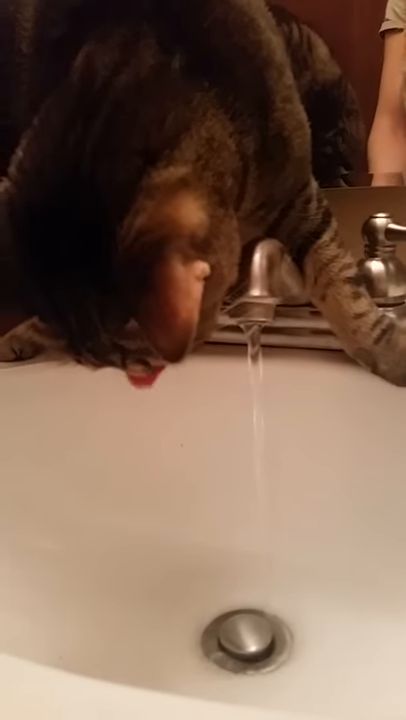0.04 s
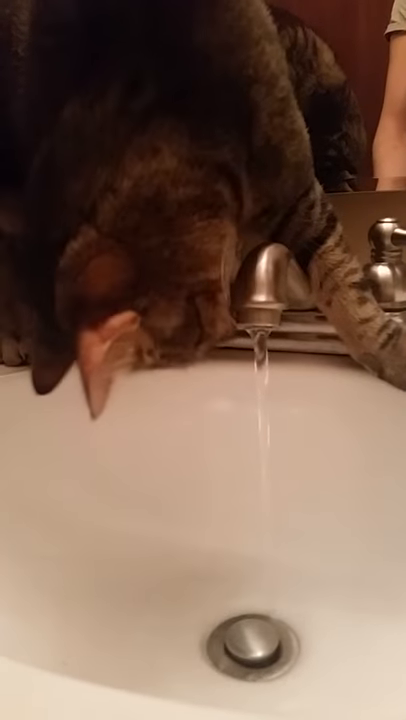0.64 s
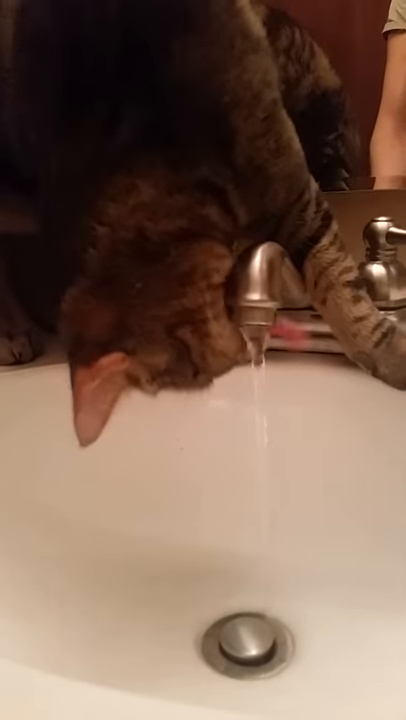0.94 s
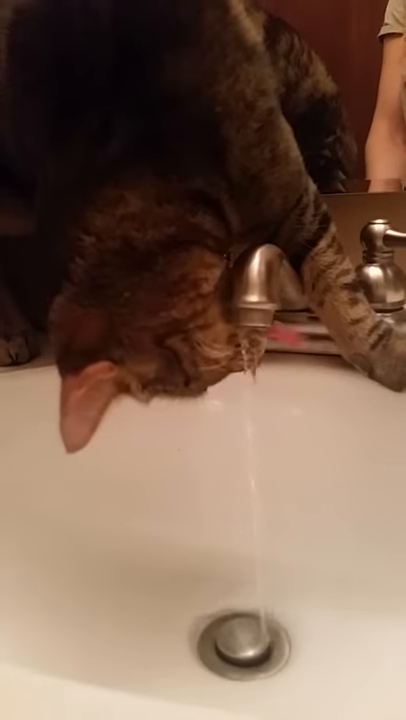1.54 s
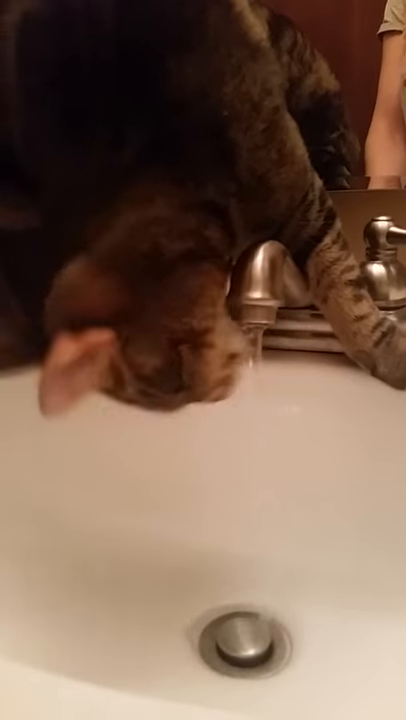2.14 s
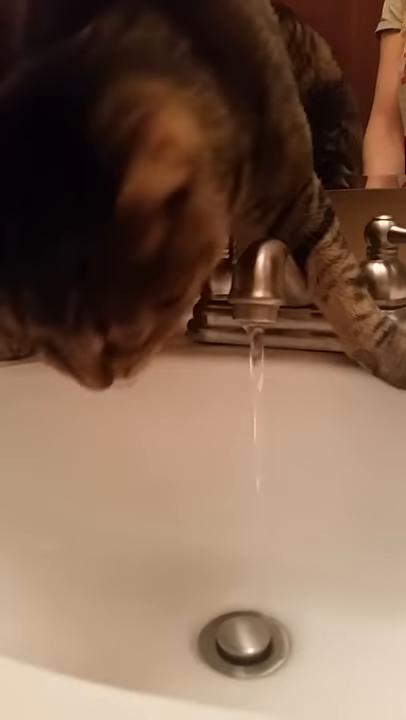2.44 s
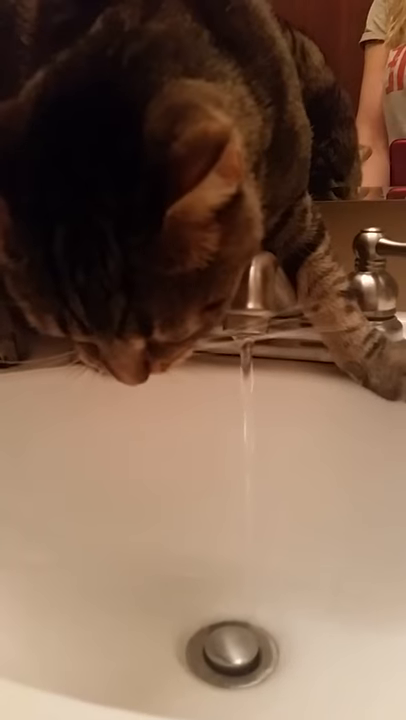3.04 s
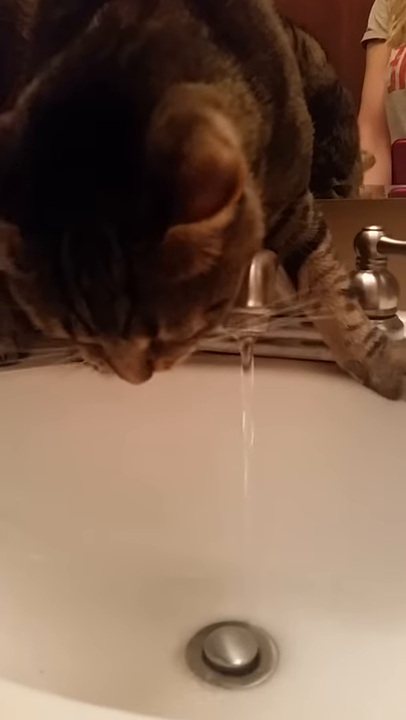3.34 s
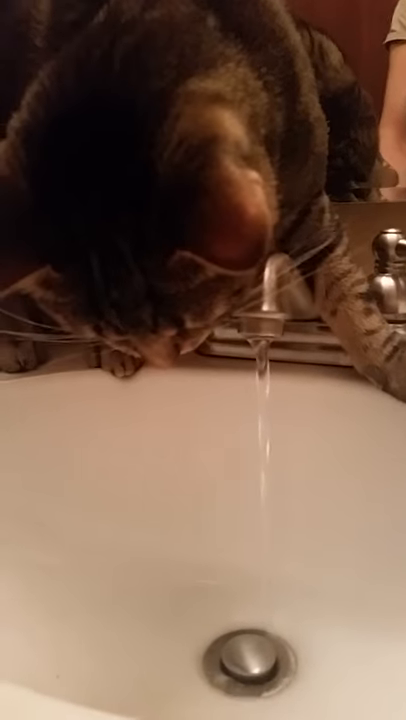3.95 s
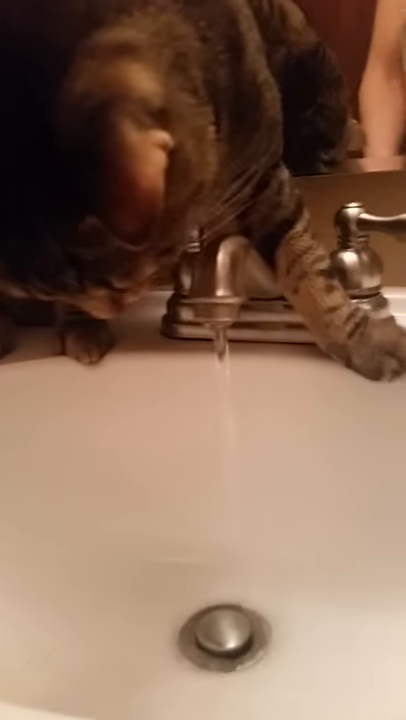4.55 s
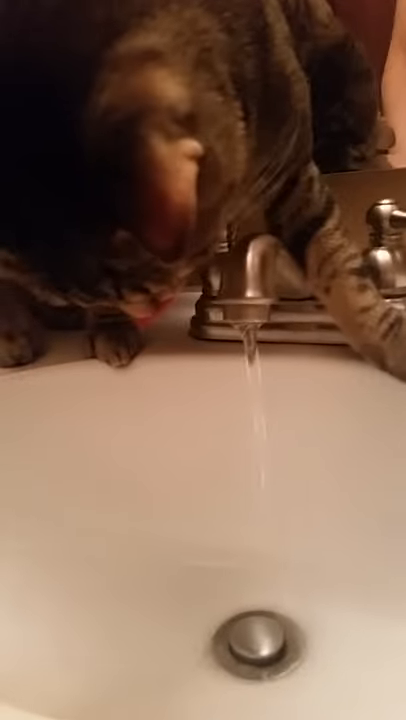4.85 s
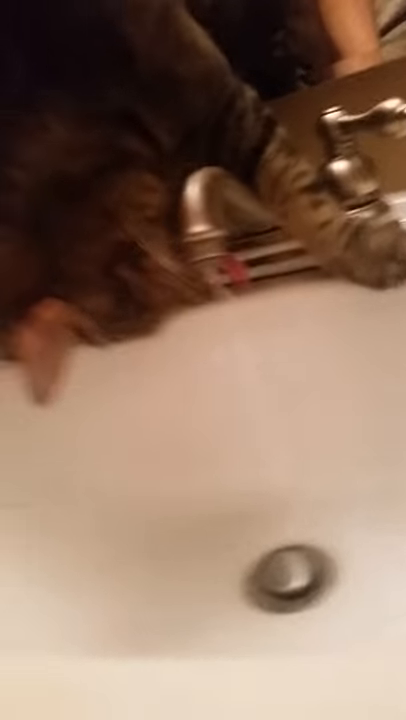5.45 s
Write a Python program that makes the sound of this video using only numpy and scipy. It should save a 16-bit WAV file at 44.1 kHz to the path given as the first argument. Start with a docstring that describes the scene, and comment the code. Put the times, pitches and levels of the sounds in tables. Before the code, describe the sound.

A thin tap stream hisses and whistles into a sink while a cat laps faintly, over a humming bathroom fan.

```python
"""Cat drinking at a bathroom tap

A handheld stereo phone, close to a china basin in a small bathroom. The barely open valve hisses and
whistles very high, its thin stream patters in the bowl, and a cat's tongue slaps it and flicks off drops.
Behind them an extractor fan hums and rumbles. Near the end the phone shifts and is softly bumped."""
import sys
import numpy as np
from scipy import signal
from scipy.fft import rfft, irfft
from scipy.io import wavfile

SR = 44100
rng = np.random.default_rng(int(sys.argv[2]) if len(sys.argv) > 2 else 0)


def wav_out(sig):
    """Save sig, one row per channel (or a flat mono array), as 16-bit PCM at SR to the path in sys.argv[1]."""
    wavfile.write(sys.argv[1], SR, np.round(np.clip(np.atleast_2d(sig).T, -1, 1) * 32767).astype(np.int16))


N = 251370
TIME = np.arange(N) / SR
FREQ = np.maximum(np.arange(N // 2 + 1) * SR / N, 1)

# laps of the tongue: start_s, slap_relative_db, centre_hz, width_octaves, t60_s, pocket_relative_db
LAPS = [(1.229, -35, 9500, 0.5, .007, -65), (1.3875, -24.5, 11800, 0.18, 0.007, -63),
        (1.650, -44, 3750, 0.12, 0.008, -51), (1.866, -35, 5600, 0.4, 0.007, -46),
        (1.953, -47, 2730, 0.25, 0.025, -57)]


def valve_hiss():
    """Water squeezes through the narrow seat and hisses, spluttering when the tongue narrows the spout."""
    # spectrum of the hiss: frequency_hz, relative_db
    spectrum = [(2900, -73), (4200, -59), (5900, -47), (6950, -1), (7900, -12), (8700, 0.5), (9400, -5.5),
                (10800, 5), (11250, 2), (12300, 13), (13200, 1), (14400, -3)]
    # how its colour differs between the microphones: frequency_hz, left_minus_right_db
    shade = [(4000, -17), (6200, -29), (7000, -1), (7700, 15.5), (9000, -2.5), (10700, -5), (11300, -10),
             (11700, -9), (12100, -4.5), (12500, -14.5), (13000, -3), (14000, -10)]
    # the tap from the phone's position: time_s, level_db, balance_db (only its swing about the mean counts)
    tap = [(0.15, -44, -5.5), (1.96, -42.5, -3.5), (3.4, -43, -4.5), (4.5, -43, -4.5), (5.0, -42, -5),
           (5.35, -43.5, -2.5), (5.65, -43.5, -1)]
    # splutters at the spout: peak_s, db_against_steady_hiss, length_s
    splutters = [(1.402, -2, 0.036), (1.745, 2.5, 0.04), (1.845, 0, 0.07), (2.9, -7, .06),
                 (3.41, -7, 0.035), (3.92, -1, 0.058)]
    hiss = colour(stereo_noise(unshared=.98), spectrum)
    hiss = np.array([colour(mic, [(hz, sign * db / 2) for hz, db in shade])
                     for mic, sign in zip(hiss, (1, -1))])
    hiss = level(flutter(hiss, rate_hz=23), 0) * undb(curve(tap))
    balance_db = curve(tap, column=2)
    return hiss * pan(balance_db - np.mean(balance_db)) * surges(splutters, 0)


def valve():
    """Eddies ring the valve's high whistles, which flicker together with its hiss."""
    # main whistle: pitch_hz, width_hz, relative_db
    high_modes = [(12190, 30, -11), (12268, 35, -7), (12385, 45, -2), (12470, 40, -7), (12531, 36, 0),
                  (12620, 40, -12)]
    # fainter, lower whistle that comes out as the phone shifts: pitch_hz, width_hz, relative_db
    low_modes = [(11476, 45, -6), (11716, 50, 0)]
    # the whistle beams narrowly, so it swells and fades at the phone: time_s, level_db, left_minus_right_db
    beam = [(0.15, -50, -3), (1.8, -49.5, -10), (2.7, -49.5, -7), (3.3, -51.5, -18.5), (4.15, -50, -7),
            (4.5, -46, 0), (5.05, -48.5, 0), (5.35, -54, 9), (5.7, -59, 4)]
    hiss = valve_hiss()
    eddies = stereo_noise(unshared=.68)
    high = level(resonate(eddies, high_modes), 0) * undb(curve(beam) + .55 * wander(23))
    high *= pan(curve(beam, column=2))
    low = level(resonate(eddies, low_modes), -68) * undb(11 * phone_shift()) * pan(4.6)
    flicker_db = .58 * wander(23) + .49 * wander(200)
    left, right = (hiss + high + low) * undb(flicker_db)
    return np.array([left, np.roll(right, 1)])  # reaches the right microphone a hair later


def flutter(x, rate_hz, depth_db=1.1):
    """Overlapping treble bands each rise and fall on their own."""
    spectrum, centres_hz = rfft(x), np.linspace(6000, 15000, 6)
    bands = [irfft(spectrum * np.interp(FREQ, centres_hz, pick), N) for pick in np.eye(len(centres_hz))]
    return sum(band * undb(depth_db * wander(rate_hz)) for band in bands)


def cat():
    """The tongue slaps the stream, an air pocket rings, the water smacks back and flicked drops land."""
    # drops tick on the china or plink in the wet: start_s, relative_db, centre_hz, width_octaves, t60_s
    drops = [(1.237, -38, 10000, .5, .012), (1.657, -53, 5700, .12, .04), (1.81, -39, 13800, 0.11, .03),
             (1.8745, -39, 7200, .3, .01), (1.991, -54, 3300, .3, .03), (2.17, -41, 9000, .3, .012),
             (2.179, -39, 10500, 0.47, .012), (2.306, -55, 3800, .35, .02), (2.359, -49, 4500, .22, .025),
             (2.369, -45, 7500, .4, .015), (2.4412, -33, 10800, .13, .012),
             (2.4962, -32.5, 9950, 0.26, 0.011), (3.4441, -40, 9500, 0.37, .015),
             (4.599, -44, 7500, 0.33, .02), (4.622, -55, 5440, 0.2, .05), (4.68, -40, 10000, .35, .012),
             (5.463, -44, 9200, 0.23, 0.051)]
    slaps = [lap[:-1] for lap in LAPS]
    # each smack comes just after its slap, softer and ringing longer
    smacks = [(s + .008, db - 12, hz, octaves, t60 * 4) for s, db, hz, octaves, t60 in slaps]
    lapping = bursts(slaps) + air_pocket() + bursts(smacks) + bursts(drops)
    return room(lapping, t60_s=.15, wet_db=-5) * undb(4) * pan(-1)


def air_pocket():
    """Each lap rings the air between tongue and water, a slightly different pocket every time."""
    # resonances of the pocket: pitch_hz, relative_db, t60_s
    modes = [(3460, 10, 0.029), (3920, 1, 0.022), (4960, 7, 0.031)]
    out, t = np.zeros(N), TIME[:SR // 4]
    for start_s, *_, ring_db in LAPS:
        detunes = 1 + .012 * rng.standard_normal(len(modes))
        ring = sum(undb(db - 60 * t / t60) * np.sin(2 * np.pi * hz * detune * t)
                   for (hz, db, t60), detune in zip(modes, detunes))
        start = int(start_s * SR)
        out[start:start + len(t)] += undb(ring_db) * ring / np.max(np.abs(ring))
    return out


def stream():
    """The thin stream patters on the china and throws a fine spray when it is broken."""
    # the stream wobbles and splats: peak_s, level_db, length_s
    splats = [(1.23, -67, 0.12), (1.69, -61, 0.13), (1.9, -58, 0.2), (2.05, -63.5, 0.51),
              (2.36, -60, 0.061), (2.92, -65, 0.22), (3.3, -61.5, 0.2), (3.5, -58.5, 0.11),
              (3.59, -64, 0.1), (4.05, -60, 0.099), (4.4, -64, .08), (4.78, -64, .1), (5.36, -63.5, 0.78)]
    # it breaks into spurts of spray: peak_s, level_db, length_s
    spurts = [(.25, -48, 0.054), (.39, -52.5, 0.064), (1.415, -52, 0.07), (1.88, -46, 0.077),
              (1.97, -54, .1), (2.08, -48.5, 0.07), (2.34, -62, 0.072), (2.67, -52, 0.1),
              (2.93, -55, 0.054), (3.4, -56, .08), (3.95, -52, 0.076), (4.06, -51, 0.082),
              (4.2, -66, 0.033), (4.8, -64, .05), (5.28, -56, 0.51)]
    wobble_db = 2.1
    # in the hard bowl each microphone catches its own mix of drops
    drops = np.array([bubbles(count=6000, samples=256, centre_hz=5000, octaves=.9, cycles=10.2, glide=.008)
                      for _ in range(2)])
    patter = level(patter_colour(drops), 0) + level(drops, -11)
    patter *= surges(splats, -65.5) * undb(wobble_db * wander(19))
    mist = np.array([impacts(per_second=1400, scatter_db=13) for _ in range(2)])
    spray = level(resonate(mist, [(9900, 11000, 0)], passes=3), 0)
    spray *= surges(spurts, -62) * undb(wobble_db * wander(22))
    return patter * pan(-1.5) + spray * pan(.5)


def patter_colour(x, pitch_drift=.016, waver_db=2.6):
    """The patter rings in five narrow treble bands, each drifting in pitch and level."""
    # bands of the patter: pitch_hz, width_hz, relative_db
    bands = [(3820, 360, 1.5), (4300, 146, 0), (4977, 210, 1.5), (5530, 104, 5.5), (6260, 180, 3.5)]
    out = 0
    for hz, width, db in bands:
        ring = resonate(x, [(hz, width, 0)], passes=2)
        warped_s = TIME + pitch_drift * np.cumsum(wander(12)) / SR
        drifting = np.array([np.interp(warped_s % TIME[-1], TIME, mic) for mic in ring])
        out += drifting * undb(db + waver_db * wander(12))
    return out


def gurgles():
    """The stream drags air into the wet film, and clusters of like-sized bubbles ring."""
    # bubble clusters: peak_s, level_db, length_s, centre_hz
    clusters = [(0.264, -58.5, 0.044, 4200), (2.763, -59, .075, 3960), (3.273, -64, 0.069, 4100),
                (3.5, -62, 0.044, 5020), (3.572, -58, 0.093, 4490), (4.043, -63.5, 0.056, 4460)]
    out = 0
    for peak_s, db, length_s, hz in clusters:
        cluster = np.array([bubbles(count=1400, samples=700, centre_hz=hz, octaves=.3, cycles=26, glide=.0005)
                            for _ in range(2)])
        out += level(cluster, 0) * surges([(peak_s, db, length_s)])
    return out * pan(.66)


def crackle():
    """Small bubbles pop on the spout and the wet muzzle while it is in the stream."""
    # flurries of pops: peak_s, level_db, length_s
    flurries = [(1.89, -61.5, 0.085), (1.99, -61.5, 0.086), (2.13, -69, 0.26), (2.35, -66, 0.17)]
    pops = bubbles(count=2000, samples=256, centre_hz=4500, octaves=1, cycles=9, glide=.003, scatter_db=2)
    return level(room(pops, t60_s=.06, wet_db=0), 0) * surges(flurries)


def bumps():
    """Each soft knock on the phone is a heavily damped low swing; the hardest also clacks the case."""
    # knocks: start_s, level_db, pitch_hz, t60_s
    knocks = [(4.707, -29, 132, 0.067), (5.069, -22.5, 190, 0.035), (5.077, -23.5, 138, 0.024)]
    # clack of the case: start_s, level_db, centre_hz, width_octaves, t60_s
    clacks = [(5.069, -31.5, 620, 0.38, 0.033)]
    out = bursts(clacks)
    for start_s, db, hz, t60 in knocks:
        t = np.maximum(TIME - start_s, 0)
        out -= undb(db - 60 * t / t60) * np.sin(2 * np.pi * hz * t)
    return out


def rustle():
    """A hand brushes the phone as it moves."""
    # low body of the rub: centre_hz, width_hz, relative_db
    body = [(393, 220, 0)]
    peak_s, level_db, length_s = 5.315, -47.5, .26
    rub = level(resonate(rng.standard_normal(N), body, passes=2), 0)
    return rub * surges([(peak_s, level_db, length_s)])


def fan():
    """The extractor's mains hum and blade tones, over turbulent air that rings the duct and the room."""
    # spectrum of the rushing air: frequency_hz, relative_db
    air_spectrum = [(15, -22), (30, -16), (52, -14), (80, -4), (105, -9.5), (140, 1), (200, -12.5),
                    (300, -11), (430, -12.5), (560, -15), (700, -14.5), (790, -20.5), (1000, -23),
                    (1300, -28.5), (2000, -29), (2500, -27), (3050, -46.5), (4000, -114)]
    # resonances of duct and room: pitch_hz, width_hz, relative_db
    duct_modes = [(101.5, 1.4, -8), (139.5, 1.8, -4), (145.8, 3.1, 1), (178.4, 3.2, -4.5), (429.6, 3, -8),
                  (722, 5.8, -11), (1023, 9.6, -23)]
    # the duct booms for a moment: peak_s, db_against_steady_ring, length_s
    booms = [(1.42, -6, 0.081), (2.19, 4.5, .12), (2.88, 3, 0.13), (3.92, -2, 0.19)]
    # motor and blade tones: pitch_hz, level_db, left_minus_right_db
    tones = [(60, -61.5, 0), (120, -45.2, 0.8), (296.2, -60.5, -7), (666.5, -62, -10)]
    air = level(colour(rng.standard_normal((2, N)), air_spectrum), -44.94)
    duct = level(resonate(rng.standard_normal((2, N)), duct_modes), -50.2)
    duct *= surges(booms, 0) * undb(1.5 * wander(3.3))
    mid, side = (air + duct) * undb(.83 * phone_shift())
    hum = 0
    for hz, db, balance_db in tones:
        phase = 2 * np.pi * hz * TIME + hz / 900 * wander(.61)  # the rotor's speed wavers a little
        waver_db = 1.33 * (wander(6) + wander(28))  # slow sway plus quicker roughness
        hum += level(np.sin(phase) * undb(waver_db), db) * pan(balance_db)
    return bass_phase_lead(spread(mid, side) * pan(-.53) + hum)


def spread(mid, side):
    """Room sound is alike at both microphones in the bass and unrelated higher up."""
    # stereo width of the room: frequency_hz, side_minus_mid_db
    width = [(60, -8.5), (110, -16.5), (200, -11), (380, -7.5), (700, -2.5), (1290, 2.5), (2380, -0.5),
             (4400, 4)]
    return mid + colour(side, width) * np.array([[1], [-1]])


def bass_phase_lead(stereo):
    """The rumble's phase runs slightly ahead on the left, widening the deep bass."""
    # phase of left against right: frequency_hz, lead_radians
    lead = [(30, 0.72), (60, 0.66), (120, 0.032), (300, 0.16), (700, 0.13)]
    hz, radians = np.transpose(lead)
    turn = np.interp(np.log(FREQ), np.log(hz), radians) * np.array([[.5], [-.5]])
    return irfft(rfft(stereo) * np.exp(1j * turn), N)


def drone():
    """A narrow hollow resonance swells and sinks, and grows as the phone shifts."""
    # swells: peak_s, level_db, length_s
    swells = [(1.8, -47, 0.12), (3.59, -48.5, 0.13), (4.72, -40.5, 0.066), (5.09, -46, 0.31),
              (5.34, -41.5, 0.1), (5.61, -42.5, 0.076)]
    ring = level(resonate(rng.standard_normal(N), [(248.8, 29.3, 0)], passes=2), 0)
    return ring * surges(swells, -58 + 5 * phone_shift()) * pan(-5.5)


def pipe():
    """The flow rings the supply pipe faintly, a little clearer once the phone has moved."""
    # resonances of the pipe: pitch_hz, width_hz, relative_db
    modes = [(2289, 20, 0), (2355, 20, -9), (2444, 20, -11)]
    return level(resonate(stereo_noise(unshared=.17), modes), -66) * undb(3 * phone_shift())


def phone_shift(middle_s=4.3, length_s=1.6):
    """How far the phone has moved, easing from 0 to 1."""
    return .5 + .5 * np.tanh(2 * (TIME - middle_s) / length_s)


def room(x, t60_s, wet_db):
    """Direct sound plus the short dense ring of basin and tiles, different at each microphone."""
    t = TIME[:SR // 2]
    tail = rng.standard_normal((2, len(t))) * undb(-60 * t / t60_s)
    tail *= undb(wet_db) / np.sqrt(np.sum(tail ** 2) / 2)
    return x + signal.fftconvolve(np.atleast_2d(x), tail, axes=1)[:, :N]


def bubbles(count, samples, centre_hz, octaves, cycles, glide, scatter_db=1.5):
    """Tiny bubbles at random times, each ringing briefly at its own rising pitch."""
    when, pitch, strength = rng.random((count, 3)).T[:, :, None]
    turns = centre_hz * 2 ** (octaves * (pitch - .5)) * TIME[:samples]
    strength_db = np.minimum(-scatter_db * np.log(strength), 18)
    rings = undb(strength_db) * np.sin(2 * np.pi * turns * (1 + glide * turns)) * np.exp(-turns / cycles)
    positions = (when * N).astype(int) + np.arange(samples)
    return np.bincount(positions.ravel(), rings.ravel(), N)[:N]


def impacts(per_second, scatter_db):
    """Random tiny impacts, some much harder than the rest."""
    strength_db = np.minimum(scatter_db * rng.exponential(size=N), 18)
    hits = rng.random(N) < per_second / SR
    return hits * rng.choice([-1, 1], N) * undb(strength_db)


def bursts(events):
    """Each event is a sudden, fast-dying burst of noise in its own band."""
    out, t = np.zeros(N + SR), TIME[:SR // 2]
    hz = np.maximum(np.arange(len(t) // 2 + 1) * SR / len(t), 1)
    for start_s, db, centre_hz, octaves, t60 in events:
        band = np.exp(-.5 * (np.log2(hz / centre_hz) / octaves) ** 2)
        noise = irfft(rfft(rng.standard_normal(len(t))) * band, len(t))
        envelope = undb(-60 * t / t60) * (1 - np.exp(-2 * centre_hz * t))
        start = int(start_s * SR)
        out[start:start + len(t)] += level(noise * envelope, db) * np.sqrt(np.mean(envelope ** 2)) / 2
    return out[:N]


def surges(events, steady_db=-np.inf, rise_share=.48):
    """Gain of bell-shaped (peak_s, level_db, length_s) surges over a steady level or silence."""
    power = undb(steady_db) ** 2
    for peak_s, db, length_s in events:
        width_s = length_s * np.where(TIME < peak_s, rise_share, 1 - rise_share)
        power = power + undb(db) ** 2 * np.exp(-2 * ((TIME - peak_s) / width_s) ** 2)
    return np.sqrt(power)


def resonate(x, modes, passes=1):
    """Drive (pitch_hz, width_hz, relative_db) resonances; more passes steepen their skirts."""
    response = sum(undb(db) / (1 + 1j * (FREQ ** 2 - hz ** 2) / (FREQ * width)) for hz, width, db in modes)
    return irfft(rfft(x) * response ** passes, N)


def colour(x, points):
    """Filter by a smooth (frequency_hz, gain_db) spectrum."""
    hz, db = np.transpose(points)
    return irfft(rfft(x) * undb(np.interp(np.log(FREQ), np.log(hz), db)), N)


def stereo_noise(unshared):
    """Noise common to both microphones, plus some that each hears alone."""
    return rng.standard_normal(N) + unshared * rng.standard_normal((2, N))


def wander(rate_hz):
    """Smooth random wander with a spread of 1."""
    return level(irfft(rfft(rng.standard_normal(N)) * np.exp(-(FREQ / rate_hz) ** 2), N), 0)


def curve(table, column=1):
    """One column of a time table at every sample."""
    rows = np.array(table)
    return np.interp(TIME, rows[:, 0], rows[:, column])


def pan(db):
    """Left and right gains for a left-minus-right level."""
    return undb(np.array([db, -db]) / 2).reshape(2, -1)


def level(x, db):
    """Scale to an rms level."""
    return x * undb(db) / np.sqrt(np.mean(x ** 2))


def undb(db):
    """Decibels to gain."""
    return 10 ** (np.asarray(db) / 20)


def scene():
    """Tap and cat close up, the fan behind them, and handling noise on the phone itself."""
    background = fan() + drone()
    water = valve() + pipe() + stream() + gurgles() + crackle()
    return background + water + cat() + bumps() + rustle()


def record(dry):
    """The phone cuts the top treble steeply."""
    cutoff_hz = 14480
    return signal.sosfilt(signal.ellip(10, .2, 70, cutoff_hz, fs=SR, output="sos"), dry)


dry = scene()
out = record(dry)
wav_out(out)
```